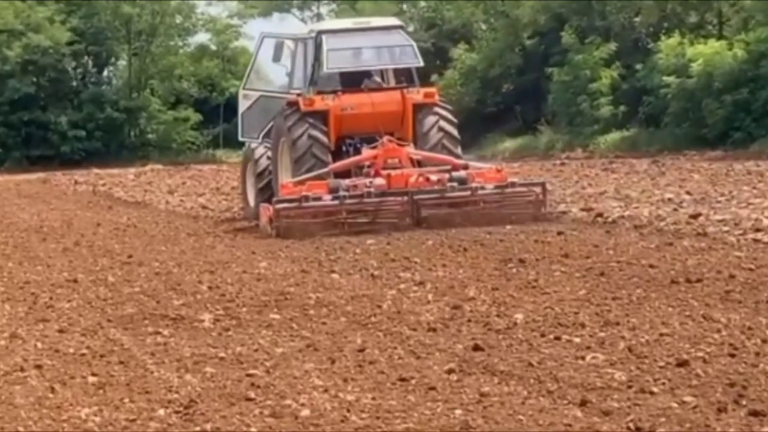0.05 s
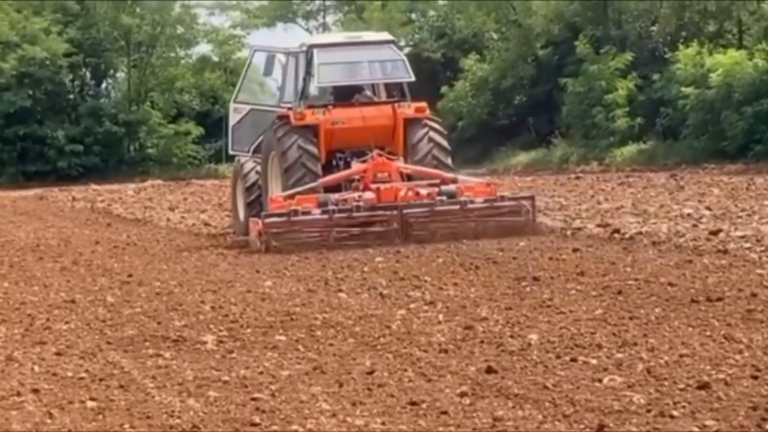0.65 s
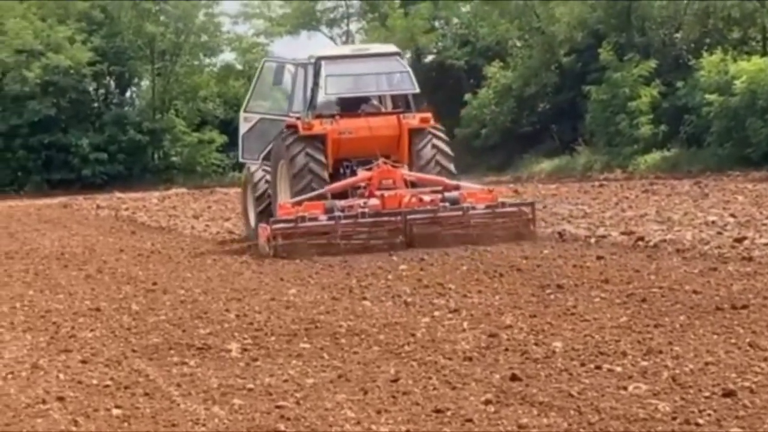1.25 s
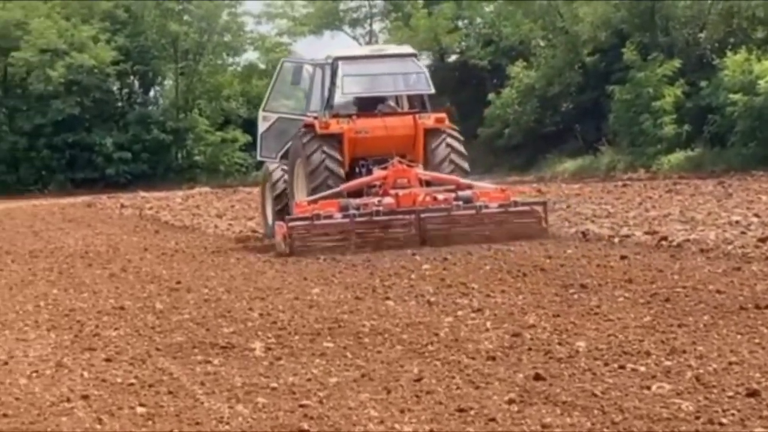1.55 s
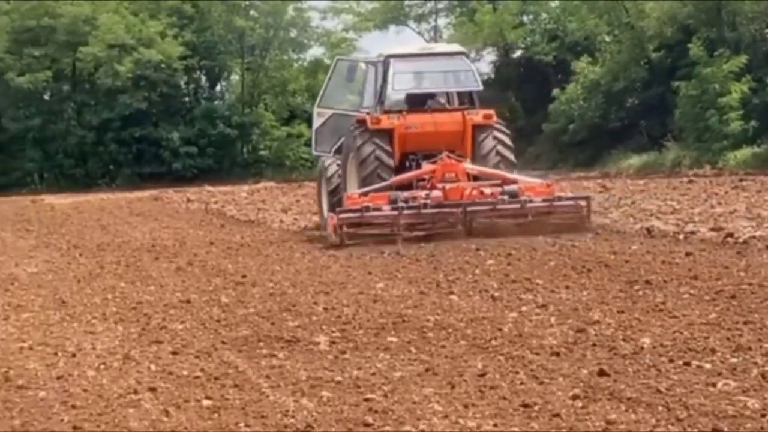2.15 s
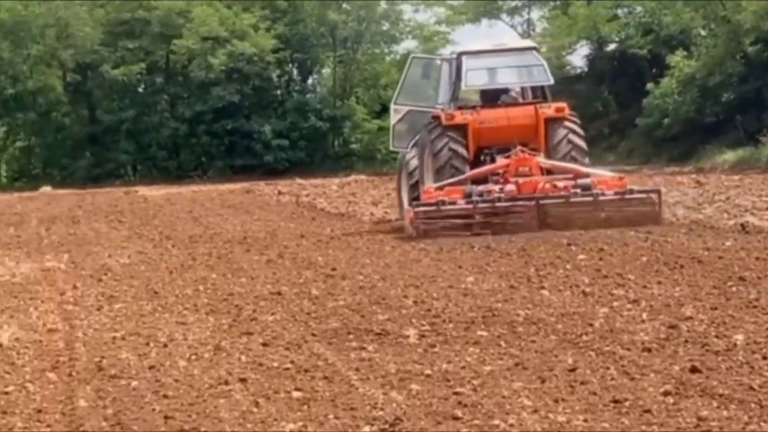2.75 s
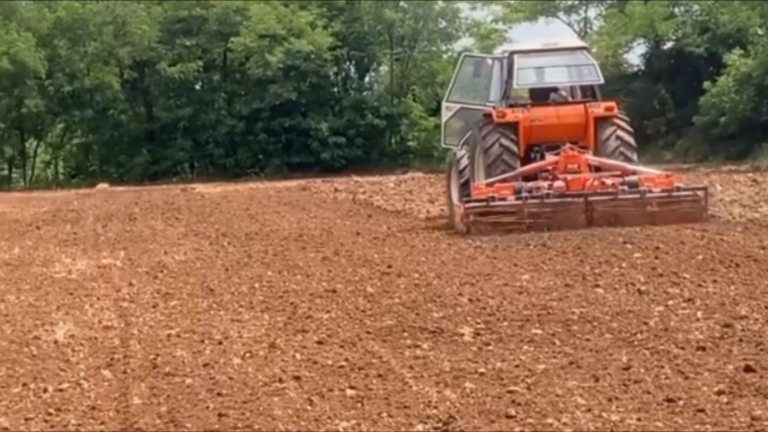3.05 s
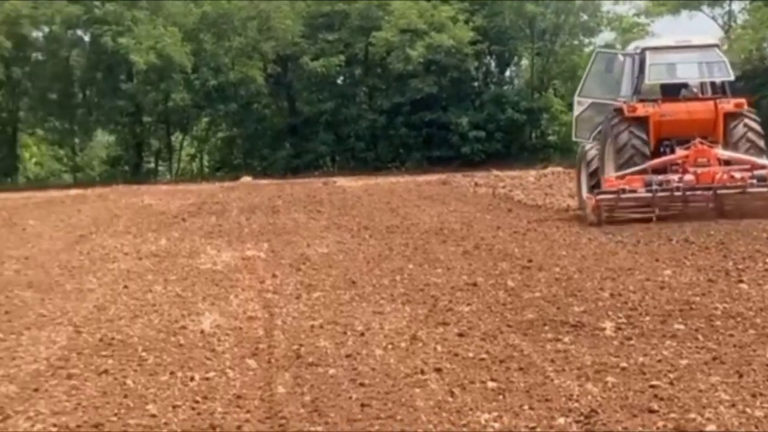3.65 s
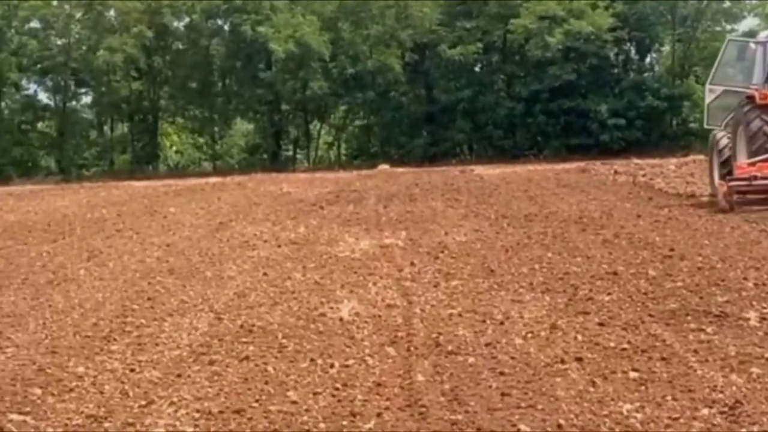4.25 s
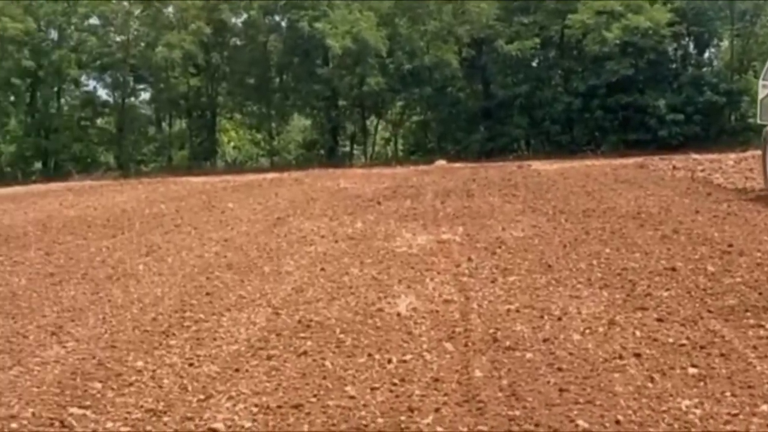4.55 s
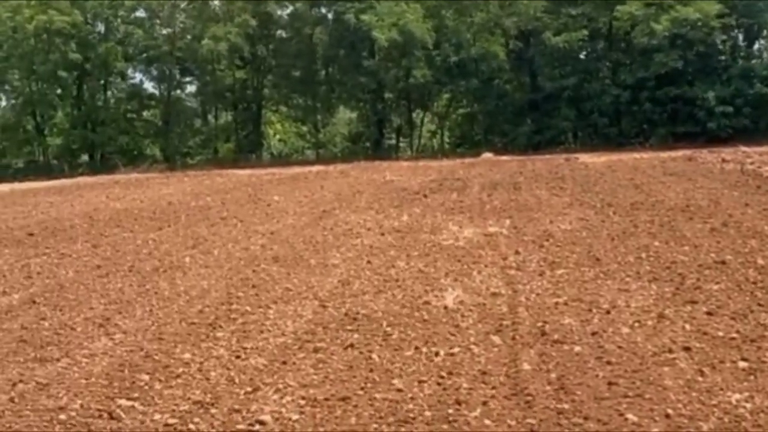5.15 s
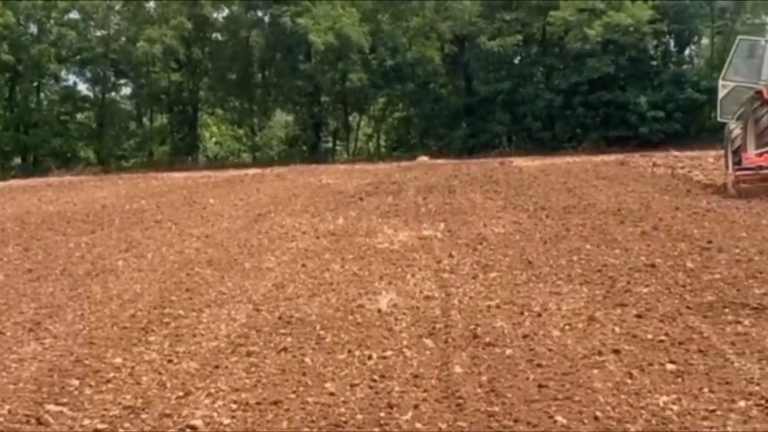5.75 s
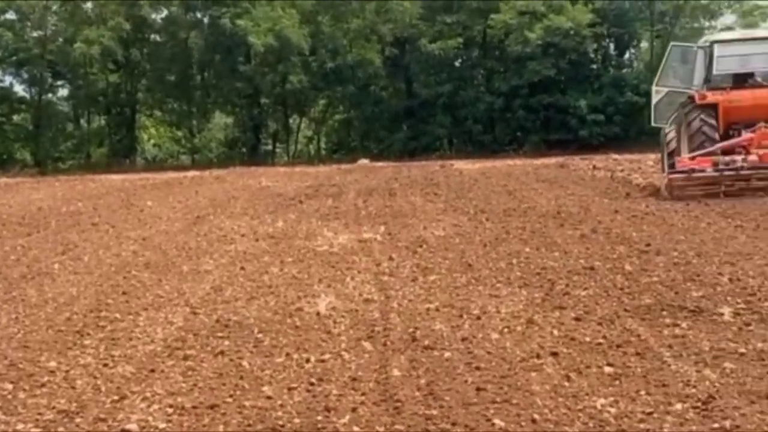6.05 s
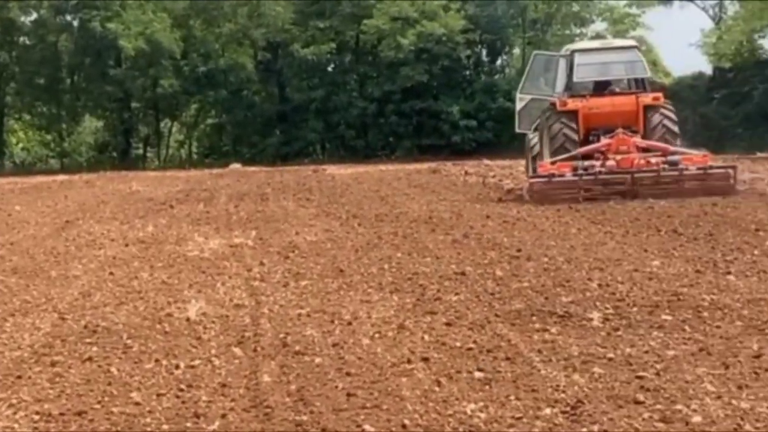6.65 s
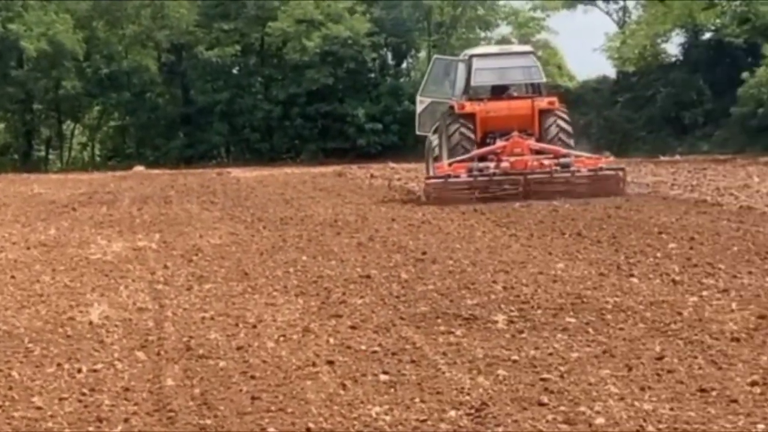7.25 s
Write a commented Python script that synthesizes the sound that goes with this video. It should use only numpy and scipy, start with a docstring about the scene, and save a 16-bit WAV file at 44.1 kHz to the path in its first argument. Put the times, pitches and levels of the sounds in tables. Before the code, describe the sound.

A diesel tractor drones steadily under load while its harrow hisses and rattles through dry soil, clinking on stones.

```python
"""A six-cylinder diesel tractor drags a harrow across an open field, some way from the microphone.
Its exhaust is a pulse train: it drones at the firing rate and excites the pipe's resonances, barking
unevenly from cylinder to cylinder. Combustion knock makes the block clatter, and the fan hums.
The harrow rattles, hisses and crackles through dry soil, and rings now and then on striking a stone.
Light wind buffets the microphone."""
import sys
import numpy as np
from scipy import signal
from scipy.fft import rfft, irfft
from scipy.io import wavfile

SR = 44100
rng = np.random.default_rng(int(sys.argv[2]) if len(sys.argv) > 2 else 0)


def store_pcm(level_fs):
    """Save levels as 16-bit WAV."""
    pcm = np.round(np.clip(level_fs, -1, 1) * 32767).astype(np.int16)
    wavfile.write(sys.argv[1], SR, np.atleast_2d(pcm).T)


N = 330750
T = np.arange(N) / SR
HZ = np.fft.rfftfreq(N, 1 / SR)


def gain_of(db):
    """Amplitude ratio of a level in decibels."""
    return 10 ** (np.asarray(db) / 20)


def unit_rms(x):
    """Normalisation to rms 1."""
    return x / np.sqrt(np.mean(x ** 2) + 1e-20)


def curve(rows):
    """Linear interpolation of (t, value) rows at every sample."""
    return np.interp(T, *np.transpose(rows))


def coloured(x, spectrum):
    """Minimum-phase filtering: causal, so pulses ring after they strike; rms 1."""
    hz, db = np.transpose(spectrum)
    log_gain = np.log(gain_of(np.interp(np.log(HZ + 1), np.log(hz), db)))
    cepstrum = irfft(log_gain, N) * np.where(np.arange(N) < N // 2, 2, 0)
    return unit_rms(irfft(rfft(x) * np.exp(rfft(cepstrum)), N))


def resonate(x, hz, width_hz):
    """Damped resonator with a gain of 1 at its peak."""
    radius = np.exp(-np.pi * width_hz / SR)
    return 2 * signal.lfilter([1 - radius], [1, -radius * np.exp(2j * np.pi * hz / SR)], x).real


def drift(rate_hz):
    """Random fluctuation: low-pass Gaussian noise of rms 1."""
    grid = T[::10]
    hz = np.fft.rfftfreq(len(grid), grid[1])
    low_pass = np.exp(-np.minimum(hz / rate_hz, 9) ** 2)
    slow = irfft(rfft(rng.standard_normal(len(grid))) * low_pass, len(grid))
    return np.interp(T, grid, unit_rms(slow))


def swell(peak_s, width_s):
    """Gaussian envelope of height 1."""
    return np.exp(-((T - peak_s) / width_s) ** 2)


def bursts(firings, decay, floor):
    """Modulated noise: it flares at each firing and decays over a share of the interval."""
    return (floor + np.exp(-(firings % 1) / decay)) * rng.standard_normal(N)


def noise_tails(impulses, decay_s):
    """Exponentially decaying noise after each impulse; rms 1."""
    envelope = signal.lfilter([1], [1, -np.exp(-1 / (decay_s * SR))], impulses)
    return unit_rms(envelope * rng.standard_normal(N))


def lope(firings, depth_db, at_firing=3.5):
    """Amplitude modulation once an engine cycle, reaching depth_db near the strongest cylinder."""
    return gain_of(depth_db * np.cos(2 * np.pi * (firings - at_firing) / len(CYLINDERS)))


# gusts on the microphone: t/s, peak level/dB
GUSTS = [(.02, -25), (.58, -25), (.92, -27), (1.72, -23), (1.95, -23), (5.14, -26), (6.74, -26)]
def gusting(width_s=.068):
    """Superposition of the gusts' envelopes, as a gain."""
    return sum(gain_of(db) * swell(s, width_s) for s, db in GUSTS)


# spectrum of the buffeting: f/Hz, relative level/dB
WIND_SPECTRUM = [(15, -44), (35, -14), (55, 7), (80, 3), (110, 1), (170, -3.5), (300, -29), (1000, -56)]
def wind(breeze_db=-36, breeze_db_per_s=-1.1):
    """Turbulent pressure on the microphone: a dying breeze and its gusts rumble."""
    breeze = gain_of(breeze_db + breeze_db_per_s * T)
    return (breeze + gusting()) * coloured(rng.standard_normal(N), WIND_SPECTRUM)


def swish(start_s=1.865, length_s=.1, rise_s=.012, fall_s=.02, glide_hz=(3250, 2600), width_hz=400):
    """Narrow-band noise on a falling carrier: one brief swish."""
    age = T - start_s
    carrier = np.exp(2j * np.pi * np.cumsum(np.interp(age, [0, length_s], glide_hz)) / SR)
    band = (carrier * (drift(width_hz) + 1j * drift(width_hz))).real
    envelope = np.exp(np.minimum(np.minimum(age / rise_s, (length_s - age) / fall_s), 0))
    return gain_of(-31) * envelope * band


# stones struck by the harrow: t/s, tick level/dB, ring gain/dB, swell of the hiss/dB
STONES = [(0.658, -22, -27, 1), (.987, -26, -40, 6), (1.635, -27, -40, 4), (2.145, -34, -42, -0.5),
          (3.928, -37, -38, 4.5), (5.884, -24, -32, 2.5)]
# modes of the struck steel: f/Hz, relative level/dB, T60/s
STEEL_MODES = [(5081, 3, .05), (10600, 0, .015), (13200, 3, .015), (14298, -21, 1.6), (15331, -24, .9)]
def stone_clinks(tick_s=.005):
    """Impact and free vibration: a stone ticks against the harrow and the steel's modes ring on."""
    out, t = np.zeros(N), T[:SR]
    ring = sum(gain_of(db - 60 * t / t60) * np.sin(2 * np.pi * hz * t) for hz, db, t60 in STEEL_MODES)
    for s, tick_db, ring_db, _ in STONES:
        tick = np.exp(-t / tick_s) * unit_rms(np.diff(rng.standard_normal(SR + 1)))
        part = out[round(s * SR):][:SR]
        part += (gain_of(ring_db) * ring + gain_of(tick_db) * tick)[:len(part)]
    return out


def hiss_gain(start_m=13.5, away_m_per_s=1.45, swell_s=.11):
    """Spherical spreading: the hiss falls as 1/distance, and swells around the stones."""
    stony_db = sum(db * swell(s, swell_s) for s, _, _, db in STONES)
    return gain_of(-35.5 + stony_db) * start_m / (start_m + away_m_per_s * T)


# spectra of the bright hiss and of the softer, crackling hiss, which has a deep notch near 9 kHz:
# f/Hz, relative level/dB
BRIGHT_SPECTRUM = [(2000, -11), (4000, -1), (5200, 0), (5700, -17), (6100, -51), (6600, 5.5), (7200, 6),
                   (8200, -0.5), (9000, -2), (10700, 5), (11200, -6.5), (11700, 1.5), (14000, -16),
                   (15300, -7.5)]
SOFT_SPECTRUM = [(2000, 6), (4400, -7), (5600, 6.5), (6500, 9), (7800, 9.5), (8500, 3), (9100, -60),
                 (9800, 3.5), (10500, 8), (11100, 0), (12800, 1), (13800, -21), (15300, -4)]
def harrow_hiss(firings, crumbs_per_s=700, crumb_s=.0013, spread_db=4, flicker_db=2):
    """Equal-power crossfade: a bright pulsing hiss yields to a softer one with crackling soil."""
    pulsing = bursts(firings - .55, decay=.37, floor=.4) * gain_of(flicker_db * drift(22))
    bright = gain_of(4.5) * coloured(pulsing, BRIGHT_SPECTRUM)
    sizes = gain_of(spread_db * np.minimum(rng.exponential(1, N), 4))
    crumbs = noise_tails(sizes * (rng.random(N) < crumbs_per_s / SR), crumb_s)
    steadier = unit_rms(bursts(firings - .25, decay=.51, floor=.91))
    soft = gain_of(1) * coloured(steadier + gain_of(-9) * crumbs, SOFT_SPECTRUM)
    share = np.sqrt(curve(HARSHNESS))  # the bright part lingers as the harshness goes
    return hiss_gain() * (np.sqrt(share) * bright + np.sqrt(1 - share) * soft)


# resonances of the harrow's loose bars: f/Hz, bandwidth/Hz, relative level/dB
BAR_MODES = [(1537, 120, -10), (1922, 160, -3), (2088, 110, 0.5), (2250, 125, -2.5), (2850, 540, -7.5),
             (3470, 410, -7.5), (4320, 350, -8.5), (5170, 580, -9.5), (6580, 370, -15.5)]
def harrow_rattle(firings, taps_per_s=1400, clump_db=1.3, jolt_db=2.5):
    """Random impact excitation: loose bars jiggle in clumps, jolted by every firing, and each rings."""
    out = np.zeros(N)
    jolts = gain_of(jolt_db * np.cos(2 * np.pi * (firings - .3)))
    shaking = lope(firings, depth_db=2.5, at_firing=3.6) * jolts
    for hz, width_hz, db in BAR_MODES:
        taps = (rng.random(N) < taps_per_s / SR) * rng.standard_normal(N)
        taps *= gain_of(clump_db * drift(20)) * shaking
        # resonating twice softens each tap and leaves valleys between the bars
        out += gain_of(db) * unit_rms(resonate(resonate(taps, hz, width_hz), hz, width_hz))
    return gain_of(curve(CLATTER_LEVEL) - 5) * unit_rms(out)


# fan tones: harmonic number, level at full hum/dB, level at thin hum/dB
FAN_HARMONICS = [(1, -34.5, -49.5), (2, -35, -44)]
def cooling_fan(firings, blades_per_firing=1.703, flutter_db=1.5):
    """Blade-passing tones: a belt-driven fan sheds one puff a blade, off the engine's orders."""
    blades, fullness = blades_per_firing * firings, curve(FULLNESS)
    out = np.zeros(N)
    for harmonic, full_db, thin_db in FAN_HARMONICS:
        level_db = thin_db + (full_db - thin_db) * fullness + flutter_db * drift(3.6)
        out += gain_of(level_db) * np.sin(2 * np.pi * harmonic * blades)
    return np.sqrt(2) * out


# clatter of block and harrow, strongest midway: t/s, relative level/dB
CLATTER_LEVEL = [(0, -28.5), (1.8, -29), (2.1, -26.5), (4.0, -27), (4.6, -29), (7.5, -29)]
# response of the engine block: f/Hz, relative level/dB
BLOCK_SPECTRUM = [(300, -16), (800, 8), (1200, -4), (1550, 0), (1750, -5.5), (2120, -1.5), (2500, -6),
                  (3200, -8), (4200, -11), (5000, -14), (6000, -45), (15000, -68)]
def block_clatter(firings, flicker_db=1.5):
    """Forced vibration: combustion knock and valve gear shake the block, a little harder once a cycle."""
    knocks = bursts(firings - .4, decay=.48, floor=4.9) * lope(firings, depth_db=-1)
    knocks *= gain_of(flicker_db * drift(40))
    return gain_of(curve(CLATTER_LEVEL) + 1.06) * coloured(knocks, BLOCK_SPECTRUM)


# the treble of rasp, hiss and hum is harsh at first, then softens: t/s, harshness (0-1)
HARSHNESS = [(0, 0.63), (.8, 0.93), (1.8, 0.62), (1.93, 0.13), (2.2, 0.33), (2.45, 0), (7.5, 0)]
# spectra of the rushing gas: f/Hz, relative level/dB
ROAR_SPECTRUM = [(30, -15), (125, -13), (165, -13), (205, -20), (245, -15), (290, -10), (335, -1),
                 (380, -0.5), (440, -10), (600, -3.5), (1200, -64)]
BOOM_SPECTRUM = [(60, -9), (140, -3.5), (200, -3.5), (260, -5.5), (330, -3), (400, -4.5), (460, -21.5),
                 (800, -39.5)]
RASP_SPECTRUM = [(700, -3.5), (1020, -3), (1100, 7), (1210, 5.5), (1300, 3.5), (1550, 10), (1680, 3),
                 (1760, 13.5), (1860, 4), (2050, 8.5), (2280, 3.5), (2450, -30), (4000, -23)]
def gas_flow(firings, roar_db=-35, boom_db=-31, rasp_db=-21.5):
    """Flow noise pumped by the firings: a low roar, a boom while the hum is full, and a harsh rasp."""
    roar = gain_of(roar_db) * coloured(bursts(firings, decay=.74, floor=1.3), ROAR_SPECTRUM)
    boom = gain_of(boom_db) * coloured(bursts(firings, decay=.8, floor=.96), BOOM_SPECTRUM)
    surges = bursts(firings - .45, decay=.36, floor=.57) * lope(firings, depth_db=.8)
    rasp = gain_of(rasp_db) * coloured(surges, RASP_SPECTRUM)
    return roar + curve(FULLNESS) * boom + curve(HARSHNESS) * rasp


# the firing tone, which drops about halfway: t/s, level/dB
DRONE_LEVEL = [(0, -10.5), (3.0, -11.3), (3.36, -16), (6.0, -17), (7.5, -18)]
def exhaust_drone(firings, waver_db=.36):
    """Fundamental of the firing rate; it dips briefly in a gust, the more so when it is weak."""
    level_db = curve(DRONE_LEVEL)
    dip_db = 4 * gusting() / gain_of(level_db)
    amplitude = np.sqrt(2) * gain_of(level_db - dip_db + waver_db * drift(13))
    return amplitude * np.cos(2 * np.pi * (firings + .15))


# the hum thins out as the drone drops: t/s, fullness (0-1)
FULLNESS = [(0, 1), (3.2, 0.96), (3.33, 0.31), (4.2, 0)]
# exhaust tones: multiple of the cycle rate, level at full hum/dB, level at thin hum/dB
CYCLE_HARMONICS = [(2, -48, -49), (3, -32, -30), (4, -42, -51), (5, -34, -43), (7, -42, -49), (8, -36, -46),
                   (9, -29, -39), (10, -44, -60), (11, -34, -59), (12, -32, -57), (13, -45, -57),
                   (14, -41, -53), (15, -37, -45), (16, -44, -49), (17, -32, -37), (18, -37, -39),
                   (19, -40, -45), (20, -43, -41), (21, -33, -44), (22, -43, -52), (23, -35, -47),
                   (24, -47, -47)]
def exhaust_hum(firings, flutter_db=1.5):
    """Harmonic series of the two-revolution cycle: weak tones below and above the drone."""
    cycles, low_fullness = firings / len(CYLINDERS), curve(FULLNESS)
    # the upper harmonics soften sooner
    high_fullness = (low_fullness + np.sqrt(curve(HARSHNESS) * low_fullness)) / 2
    out = np.zeros(N)
    for multiple, full_db, thin_db in CYCLE_HARMONICS:
        fullness = low_fullness if multiple <= 2 * len(CYLINDERS) else high_fullness
        level_db = thin_db + (full_db - thin_db) * fullness + flutter_db * drift(4.3)
        out += gain_of(level_db) * np.sin(2 * np.pi * (multiple * cycles + rng.random()))
    return np.sqrt(2) * out


# cylinders in firing order: relative level/dB, delay/firing interval, pipe echo (0-1)
CYLINDERS = [(-2.5, .33, .4), (-8, .25, .2), (-5, .25, .1), (0, .28, .8), (-2.5, .25, .3), (-7, .4, .1)]
# firings that bark harder than the rest: t/s, relative level/dB
HARD_BARKS = [(.849, 2), (1.395, 2), (1.45, 2), (1.672, 2), (1.783, 2), (1.839, 2), (1.949, 3), (2.167, 5),
              (2.546, 5), (4.161, 7), (4.641, 5), (5.552, 6), (7.275, 3)]
def exhaust_pulses(firings, scatter_db=1, jitter_s=.00007, echo_s=.002587):
    """Pulse train with reflection: each cylinder sends a sharp pulse, and the pipe returns an echo."""
    count = np.arange(1, int(firings[-1]) - 1)
    strength_db, delay, echo = np.array(CYLINDERS)[count % len(CYLINDERS)].T
    scatter, jitter = rng.standard_normal((len(count), 2)).T
    times = np.interp(count + delay, firings, T) + jitter_s * jitter
    sizes = gain_of(strength_db + scatter_db * scatter)
    for s, hard_db in HARD_BARKS:
        sizes[np.argmin(abs(times - s))] = gain_of(hard_db)
    direct = np.bincount((times * SR).astype(int), sizes, N)
    reflected = np.bincount(((times + echo_s) * SR).astype(int), sizes * echo, N)
    return direct + reflected


# resonances of the exhaust pipe: f/Hz, bandwidth/Hz, relative gain/dB
PIPE_MODES = [(570, 25, -4.5), (649, 40, -2.5), (727.7, 56, 0), (796, 43, -1.5), (892, 21, -1.5),
              (1127, 20, -20), (1203, 86, -11.5), (1500, 170, -24)]
# how hard the exhaust barks: t/s, relative level/dB
BARK_LEVEL = [(0, -19), (.5, -18), (1.88, -19), (2.15, -23), (2.9, -23), (4.5, -26.5), (5.2, -29.5),
              (5.6, -26), (6.4, -26.5), (7.5, -24)]
def exhaust_bark(firings, puff_s=.003, silencer_hz=(500, 1400)):
    """Source and filter: pulses, turbulent puffs and steady flow excite the pipe; a silencer follows."""
    pulses = exhaust_pulses(firings)
    puffs = gain_of(-6) * noise_tails(pulses, puff_s)
    flow = gain_of(-4) * rng.standard_normal(N)
    drive = gain_of(1) * unit_rms(pulses) + puffs + flow
    pipe = sum(gain_of(db) * resonate(drive, hz, width) for hz, width, db in PIPE_MODES)
    silencer = signal.butter(3, silencer_hz, "bandpass", fs=SR, output="sos")
    return gain_of(curve(BARK_LEVEL) - 1) * unit_rms(signal.sosfilt(silencer, pipe))


# engine speed, sagging once under load: t/s, firing rate/Hz
FIRING_RATE = [(0.0, 110.08), (0.98, 110.25), (1.78, 107.9), (2.4, 111.52), (3.18, 110.79), (3.55, 111.99),
               (4.62, 111.73), (4.96, 112.73), (5.76, 111.3), (6.8, 112.4), (7.5, 112.04)]
def scene():
    """Superposition of all sources; the engine's sounds share one phase, the count of firings."""
    firings = np.cumsum(curve(FIRING_RATE)) / SR
    tones = exhaust_drone(firings) + exhaust_hum(firings) + cooling_fan(firings)
    tractor = tones + exhaust_bark(firings) + gas_flow(firings) + block_clatter(firings)
    harrow = harrow_hiss(firings) + harrow_rattle(firings) + stone_clinks()
    return (tractor + harrow + swish() + wind())[None]


def record(dry, ceiling=.78, notch_hz=9050, notch_width_hz=380, notch_db=-21, cutoff_hz=15500):
    """Soft saturation rounds the loudest peaks; a deep treble notch and a low-pass filter follow."""
    rounded = dry / (1 + (dry / ceiling) ** 12) ** (1 / 12)
    notch = gain_of(notch_db * np.exp(-((HZ - notch_hz) / notch_width_hz) ** 2))
    notched = irfft(rfft(rounded) * notch, N)
    low_pass = signal.firwin(511, cutoff_hz, window=("kaiser", 9), fs=SR)
    return signal.oaconvolve(notched, low_pass[None], "same")


dry = scene()
out = record(dry)
store_pcm(out)
```